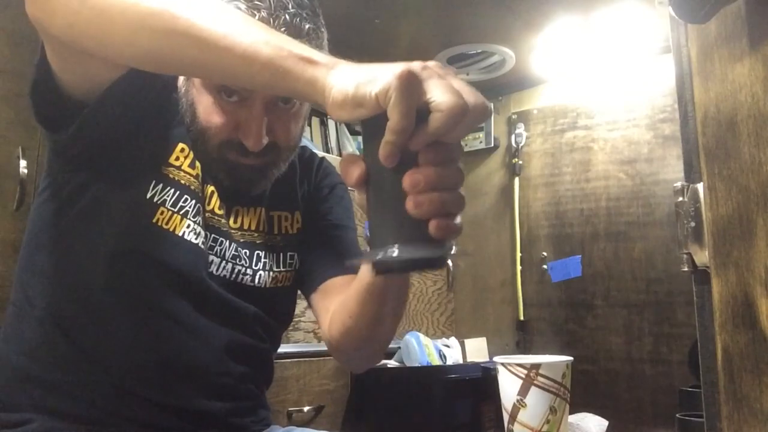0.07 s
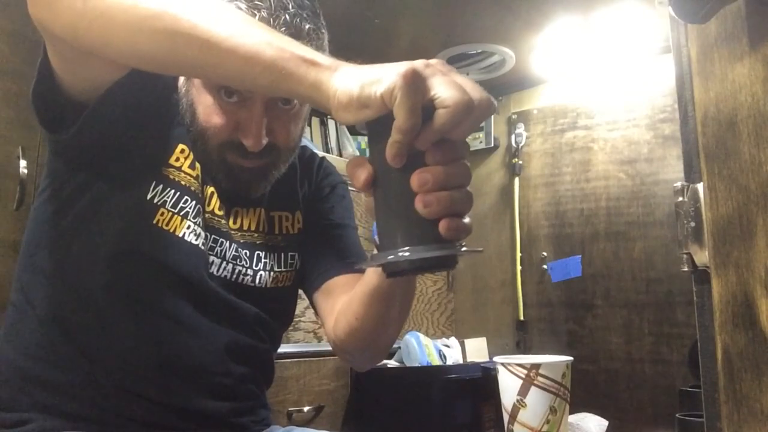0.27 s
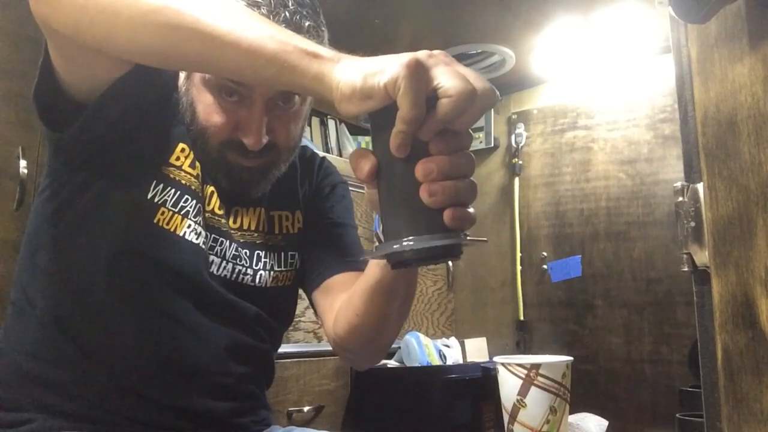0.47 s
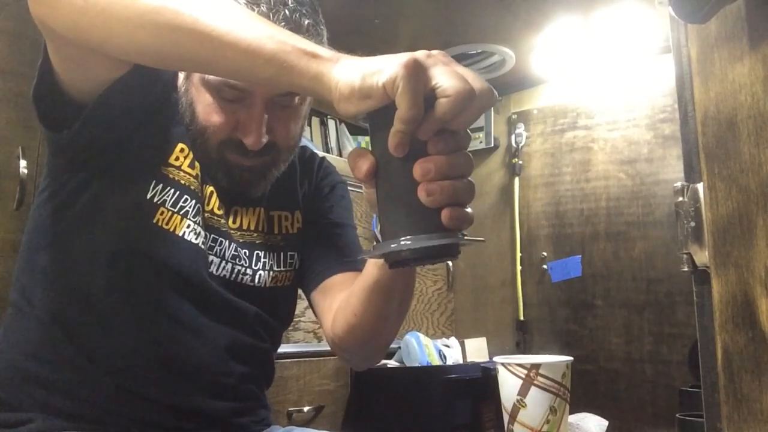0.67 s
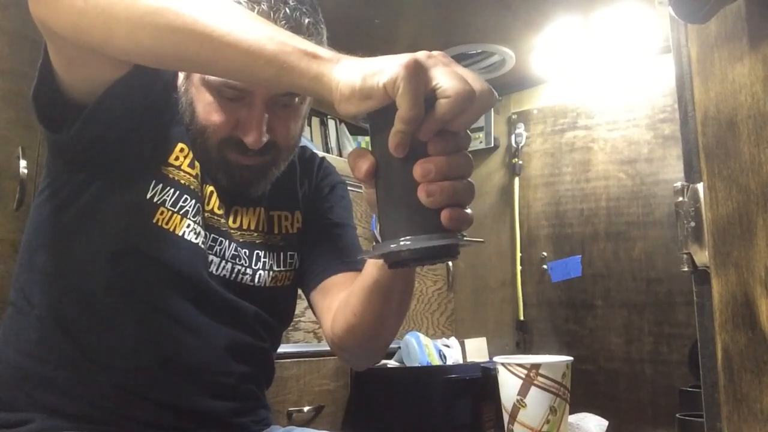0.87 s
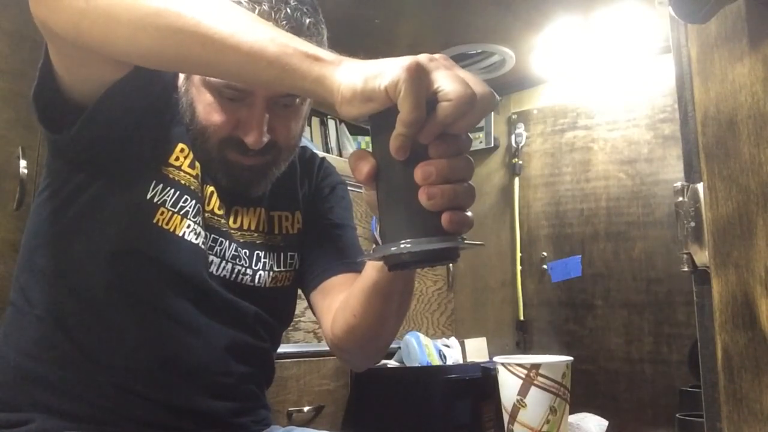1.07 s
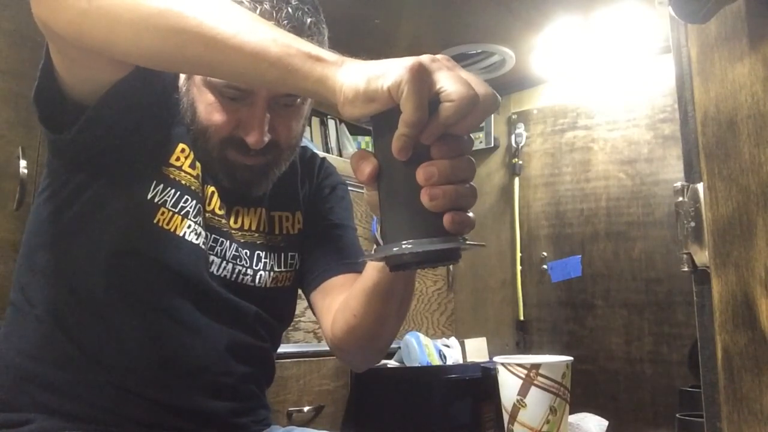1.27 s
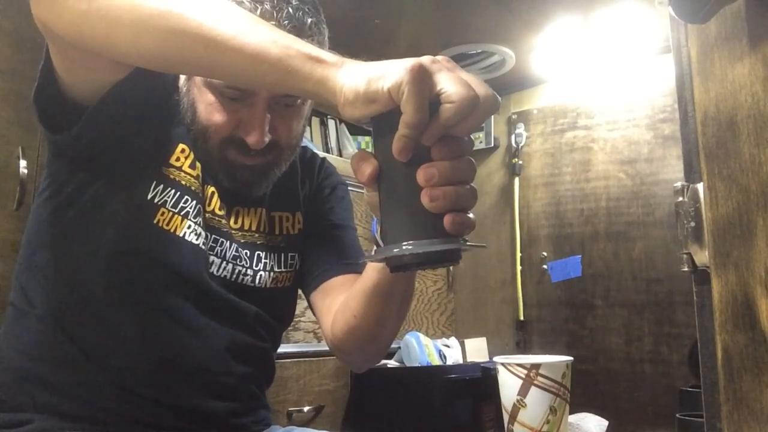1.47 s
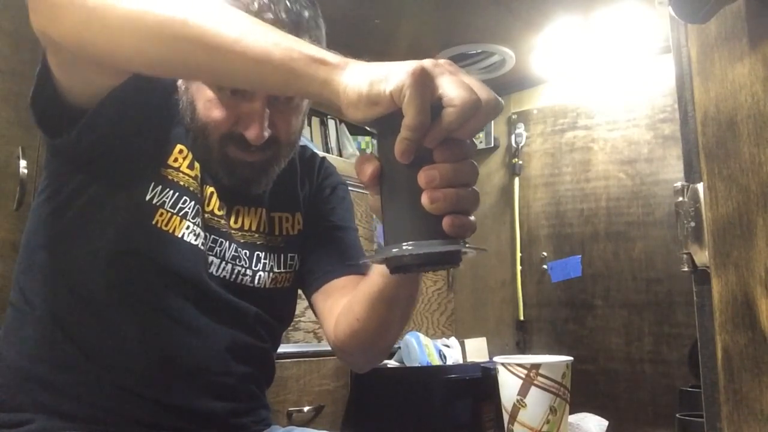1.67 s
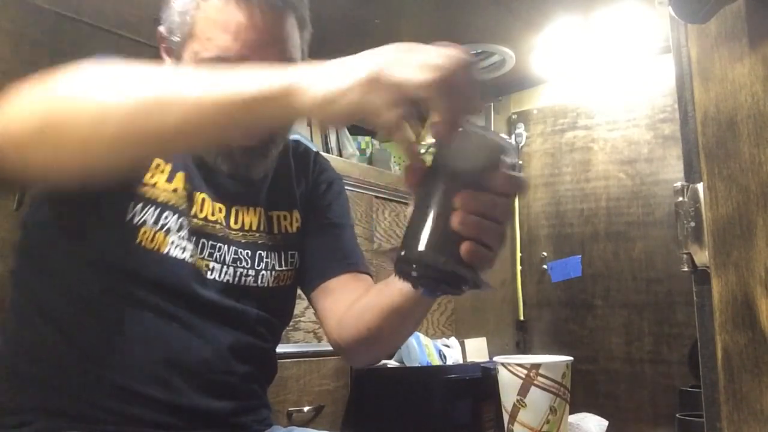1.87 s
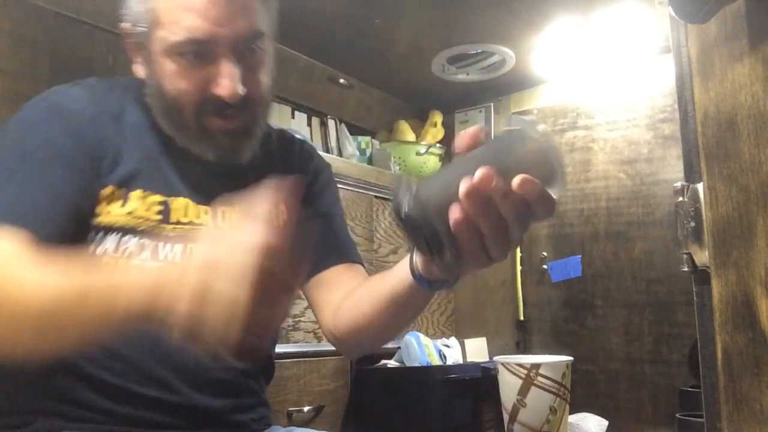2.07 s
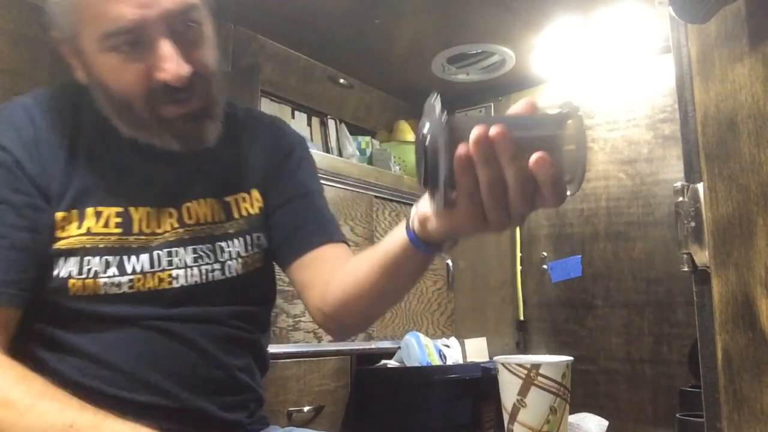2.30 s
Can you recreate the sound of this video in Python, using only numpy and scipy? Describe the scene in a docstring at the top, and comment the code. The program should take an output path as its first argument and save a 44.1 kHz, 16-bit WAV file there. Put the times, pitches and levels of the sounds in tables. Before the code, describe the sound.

A coffee plunger slams home right at the start: a loud, bright plastic clack with an airy pop, damped within about 0.15 s. Around 0.25-0.45 s spent grounds patter and thud into a paper bin, with a small rub near 0.47 s. Then quiet van rumble and faint wavering hum. At 1.77-1.95 s soft hollow taps hoot upward in pitch amid hand rustles; a last faint rub at 2.3 s. Close, with slight small-room echo.

```python
"""The dying ring of a knock, then a plastic coffee plunger clacks home, over rumble and wavering hum in a small van.
The blow is ringing modes, a pop and noise; spent grounds drop into a paper bin as grains and resonant knocks.
Hands rustle as coloured ticks. Later the plunger is drawn back and tapped: its air hoots, a sine rising in pitch.
A faint wall echo follows the near sounds; the recorder ducks its gain after loud peaks and softly clips."""
import sys
import numpy as np
from scipy import signal
from scipy.fft import rfft, irfft, next_fast_len
from scipy.io import wavfile
from scipy.ndimage import uniform_filter1d, minimum_filter1d, map_coordinates

SR = 44100
rng = np.random.default_rng(int(sys.argv[2]) if len(sys.argv) > 2 else 0)


def boost(x):
    """Linear amplitude factor 10**(x/20) for a level x in decibels (scalar or array-like)."""
    u = np.asarray(x, float) / 20
    return 10 ** u


def store_pcm(level_fs):
    """Save levels as 16-bit WAV."""
    pcm = np.round(np.clip(level_fs, -1, 1) * 32767).astype(np.int16)
    wavfile.write(sys.argv[1], SR, np.atleast_2d(pcm).T)


N = 103061
T = np.arange(N) / SR  # s


def unit(x):
    """Scale to rms 1."""
    return x / np.sqrt(np.mean(x ** 2) + 1e-20)


def along(points, hz):
    """Interpolate (Hz, value) points on a log frequency axis."""
    f, v = np.transpose(points)
    return np.interp(np.log(hz + 1), np.log(f + 1), v)


def wobble(knots_per_s):
    """Smooth random curve through normal knots."""
    knots = rng.standard_normal(int(N * knots_per_s / SR) + 4)
    return map_coordinates(knots, [T * knots_per_s])


def filtered(x, response):
    """Multiply the spectrum of x by a response of frequency in Hz."""
    m = next_fast_len(len(x) + 8192)
    return irfft(rfft(x, m) * response(np.fft.rfftfreq(m, 1 / SR)), m)[:len(x)]


def dying(start_s, t60_s, rise_s):
    """Envelope with exponential rise and decay."""
    t = np.maximum(T - start_s, 0)
    return boost(-60 * t / t60_s) * (1 - np.exp(-t / rise_s))


def tail(t60s, colour):
    """Noise in which each band dies at its own speed."""
    hz, t, z = signal.stft(rng.standard_normal(SR // 2), SR, nperseg=128)
    level_db = along(colour, hz)[:, None] - 60 * t / along(t60s, hz)[:, None]
    return signal.istft(z * boost(level_db), SR, nperseg=128)[1]


def grains(colour, spread_db):
    """Dense random ticks of uneven size, coloured, rms 1."""
    grains_per_s = 24000
    ticks = (rng.random(N) < grains_per_s / SR) * rng.standard_normal(N)
    ticks *= boost(spread_db * rng.exponential(size=N))
    return unit(filtered(ticks, lambda hz: boost(along(colour, hz))))


# Dying ring of an earlier knock. Each row: pitch in Hz, level in dB.
KNOCK_RING_PARTIALS = [(70, -28.5), (480, -27), (1100, -30.5), (2680, -20.5), (8200, -43)]
# Colour of skin rubbing. Each row: frequency in Hz, relative level in dB per Hz.
SKIN_COLOUR = [(500, -29.5), (1000, 0.5), (1900, 0.5), (3500, -6.5), (4300, -11), (8000, -16.5),
               (14700, -28.5), (16000, -61)]
# Modes of the struck plastic. Each row: pitch in Hz, relative level in dB, t60 in s.
PLASTIC_MODES = [(70, -5, .15), (620, -2.5, 0.035), (891, -7.5, 0.068), (1163, -7, 0.067),
                 (1352, -6, 0.088), (1512, -13.5, .24), (1559, -2, 0.067), (1747, -5.5, 0.097),
                 (2080, -10, 0.059), (2483, -1.5, 0.1), (2651, -3, 0.088), (4010, -4, .08),
                 (4240, 3, 0.068), (4453, -0.5, 0.065), (4920, -7, 0.06)]
# Colour of the crash noise. Each row: frequency in Hz, relative level in dB per Hz.
CRASH_COLOUR = [(30, -17.5), (70, -4), (200, -15), (500, -5), (750, -13.5), (1340, -2), (2000, -6.5),
                (4320, -1.5), (7600, -7.5), (8600, -18.5), (14900, -27.5), (16000, -60.5)]
# Decay of the crash noise. Each row: frequency in Hz, t60 in s.
CRASH_DECAY = [(100, .12), (500, 0.055), (2000, 0.11), (12000, 0.083)]
# Short cracks as the plunger chatters. Each row: delay after the blow in s, relative level in dB.
REBOUND_CRACKS = [(0, 5), (.0043, 2), (.0125, -2.5)]


def plunger():
    """An earlier knock's ring ends, then the blow rings the plastic, pops the air and sprays noise."""
    knock_ring_end_s, blow_s, blow_db = .0065, .0097, 7
    ring_db, grip_s, grip_t60_s = -15, 0.093, 0.07
    pop_hz, pop_db, pop_t60_s = 528, -5, 0.024
    crack_s, crash_db = .0007, -11.5

    knock_ring = sum(boost(db) * np.sin(2 * np.pi * hz * T + 1.5 * wobble(450))
                     for hz, db in KNOCK_RING_PARTIALS)
    knock_ring += boost(-40) * grains(SKIN_COLOUR, spread_db=0.6)
    knock_ring *= np.exp(-np.maximum(T - knock_ring_end_s, 0) / 0.00039)

    since_s = T - blow_s
    blow = np.zeros(N)
    for hz, db, t60_s in PLASTIC_MODES:
        mode = np.sin(2 * np.pi * hz * since_s + 0.4 * wobble(80))
        blow += boost(ring_db + db) * dying(blow_s, t60_s, 0.000067) * mode
    blow *= boost(-60 * np.maximum(T - grip_s, 0) / grip_t60_s)  # the hand closes and damps the ring
    blow += boost(pop_db) * dying(blow_s, pop_t60_s, 0.0005) * np.sin(2 * np.pi * pop_hz * since_s)

    crash = tail(CRASH_DECAY, CRASH_COLOUR)
    t = T[:len(crash)]
    cracks = sum(boost(db) * (t >= late_s) * np.exp(-np.abs(t - late_s) / crack_s)
                 for late_s, db in REBOUND_CRACKS)
    crash = (1 + cracks) * crash / crash[:400].std()
    blow[round(blow_s * SR):][:len(crash)] += boost(crash_db) * crash
    return knock_ring + boost(blow_db) * blow


# Decay of the wall echo. Each row: frequency in Hz, t60 in s.
WALLS_DECAY = [(200, .2), (2000, 0.23), (10000, 0.053)]


def walls(near):
    """Echo: near sounds, 130 samples late, convolved with decaying noise."""
    walls_db = -28
    echo = tail(WALLS_DECAY, [(100, 0)])
    wet = signal.fftconvolve(np.pad(near, (130, 0)), echo / np.linalg.norm(echo))[:N]
    return boost(walls_db) * wet


# Colour of rumble and hiss. Each row: frequency in Hz, relative level in dB per Hz.
VAN_COLOUR = [(20, -25), (45, -4), (91, -1), (200, -11), (290, -19), (560, -18), (800, -25.5),
              (1120, -23.5), (2300, -35), (2700, -41), (7500, -43), (8500, -46), (14700, -49.5),
              (16000, -70)]
# Hum coming and going. Each row: time in s, level in dB before wavering.
HUM_LEVEL = [(1.0, -68), (1.6, -61.5), (1.9, -65.5), (2.03, -54), (2.2, -68.5)]


def van():
    """Noise with patchy time-frequency level, plus a sine wavering in level and phase."""
    air_db, hum_hz = -50, 568
    hz, _, z = signal.stft(rng.standard_normal(N), SR, nperseg=1024)
    field = uniform_filter1d(rng.standard_normal(z.shape), 4, 0)
    field = unit(uniform_filter1d(field, 3, 1))
    patchy_db = along([(100, 3.0), (1000, 4.2), (8000, 0.79)], hz)[:, None]
    air = signal.istft(z * boost(patchy_db * field), nperseg=1024)[1][:N]
    air = filtered(air, lambda f: boost(along(VAN_COLOUR, f)))
    hum_db = np.interp(T, *np.transpose(HUM_LEVEL)) + 2.5 * wobble(12)
    hum = boost(hum_db) * np.sin(2 * np.pi * hum_hz * T + 0.36 * wobble(11))
    return boost(air_db) * unit(air) + hum


# Falling grounds. Each row: time in s, relative patter level in dB.
GROUNDS_FALL = [(.233, -60), (.256, -62.5), (.262, -47.5), (.296, -52), (.299, -34), (.306, -42.5),
                (.315, -39), (.332, -36.5), (.352, -37.5), (.368, -42.5), (.384, -55), (.396, -52),
                (.41, -57.5), (.448, -65.5), (.472, -63), (.5, -80), (.54, -77)]
# Colour of grit. Each row: frequency in Hz, relative level in dB per Hz.
PATTER_COLOUR = [(500, -12), (1200, -5.5), (4260, -6), (13800, -11.5), (15500, -14.5), (16000, -40)]
# Bin resonances. Each row: pitch in Hz, width in Hz, relative level in dB.
BIN_MODES = [(464, 80, -9.5), (589.3, 47, -8.5), (740, 69, -8.5), (885, 35, 1), (1010, 160, -10)]
# Lumps knocking the bin. Each row: time in s, relative level in dB, pitch favoured by the spot in Hz.
LUMP_KNOCKS = [(.2655, -22.5, 564), (.2685, -24.5, 1010), (.279, -39, 885), (.309, -20, 740),
               (.314, -23, 885), (.32, -25, 885), (.328, -21.5, 570), (.333, -27, 906), (0.366, -36, 900)]


def grounds():
    """Fine grains patter on the paper; each soft lump rings the bin's resonances nearest to its spot."""
    patter_db, boom_db = 5.5, 25
    lump_s, off_spot_db_per_octave = 0.00041, 34
    bin_low_hz = 446  # high-pass keeps the knocks from booming below this

    fall_db = np.interp(T, *np.transpose(GROUNDS_FALL), -120, -120)
    patter = boost(patter_db + fall_db + 1.53 * wobble(150.2)) * grains(PATTER_COLOUR, spread_db=-1.5)

    boom = np.zeros(N)
    for hz, width_hz, db in BIN_MODES:
        pushes = np.zeros(N)
        for s, level_db, spot_hz in LUMP_KNOCKS:
            push_db = level_db - off_spot_db_per_octave * abs(np.log2(hz / spot_hz))
            pushes += boost(push_db) * np.exp(-((T - s) / lump_s) ** 2)
        boom += filtered(pushes, lambda f: boost(db) * 1j * f * width_hz
                         / (hz * hz - f * f + 1j * f * width_hz))
    return patter + boost(boom_db) * filtered(boom, lambda f: (1j * f / (bin_low_hz + 1j * f)) ** 2)


# Small ticks and one low thump. Each row: start in s, level in dB before the rise, pitch in Hz.
PING_HITS = [(0.262, -30.5, 5070), (0.264, -25.5, 160), (0.2985, -25, 2940), (.298, -28.5, 6000),
             (.36, -29, 1450), (0.469, -39.5, 1809), (.317, -29, 4950), (1.776, -48, 2000),
             (1.875, -36.5, 1030), (1.916, -42, 2500), (1.93, -36.5, 1905), (1.946, -44.5, 2087)]


def pings():
    """Brief rough rings with random phase, and a thin, longer two-pitch sizzle."""
    ping_t60_s, rough_rad = 0.026, 1
    sizzle_s, sizzle_db, sizzle_t60_s = .458, -61.5, 0.4
    sizzle = sum(np.sin(2 * np.pi * hz * T + 0.87 * wobble(250)) for hz in (3400, 3630))
    out = boost(sizzle_db) * dying(sizzle_s, sizzle_t60_s, .001) * sizzle
    for s, db, hz in PING_HITS:
        ring = np.sin(2 * np.pi * hz * T + rough_rad * wobble(350))
        out += boost(db) * dying(s, ping_t60_s, 0.00093) * ring
    return out


# Rubs of the hands. Each row: start in s, length in s, level in dB before wobble, brightness 0-1.
RUSTLE_STROKES = [(0.452, 0.08, -62, 0.2), (.467, 0.0043, -47, 0), (0.581, 0.0051, -63.5, .95),
                  (1.051, 0.06, -66, 0.66), (1.747, 0.037, -62.5, .1), (1.868, 0.012, -52, 0.4),
                  (1.895, 0.055, -52.5, 0.18), (2.289, 0.0058, -54.5, 0.1), (2.3, 0.047, -65, 0.8)]


def hands():
    """Short soft rubs, blended from dull skin to bright dry grit."""
    rise_s, fade_s = 0.0029, 0.01
    dull, bright = grains(SKIN_COLOUR, spread_db=0.8), grains(PATTER_COLOUR, spread_db=0.6)
    strokes = np.zeros(N)
    for s, length_s, db, shine in RUSTLE_STROKES:
        rise = np.clip((T - s) / rise_s, 0, 1)
        fade = np.exp(-np.maximum(T - s - length_s, 0) / fade_s)
        strokes += boost(db) * rise * fade * (dull + np.clip(shine, 0, 1) * (bright - dull))
    return strokes * boost(0.83 * wobble(100))


# Air in the chamber. Each row: time in s, pitch in Hz.
CHAMBER_PITCH = [(1.772, 460), (1.8, 550), (1.825, 595), (1.88, 625), (1.92, 641)]
# Taps on the chamber. Each row: start in s, hoot level in dB, click level in dB.
CHAMBER_TAPS = [(1.773, -40.5, -49), (1.79, -39.5, -65), (1.878, -40, -60), (1.917, -29.5, -41),
                (1.922, -31.5, -55), (1.929, -26, -39.5)]


def chamber():
    """Taps click and set the air column ringing; it rises in pitch as the plunger moves."""
    hoot_t60_s, hoot_rise_s, click_t60_s, click_rise_s = 0.11, 0.0018, 0.019, 0.00025
    pitch_hz = np.interp(T, *np.transpose(CHAMBER_PITCH))
    tone = np.sin(2 * np.pi * np.cumsum(pitch_hz) / SR)
    hoot = sum(boost(db) * dying(s, hoot_t60_s, hoot_rise_s) for s, db, _ in CHAMBER_TAPS)
    click = sum(boost(db) * dying(s, click_t60_s, click_rise_s) for s, _, db in CHAMBER_TAPS)
    return hoot * tone + click * grains(SKIN_COLOUR, spread_db=0.7)


def scene():
    """Near sounds, their echo off the walls, and the van."""
    near = plunger() + grounds() + pings() + hands() + chamber()
    return (near + walls(near) + van())[None]


def top_cut(x):
    """Nothing passes above the cut-off."""
    return signal.sosfilt(signal.butter(12, 16390, fs=SR, output="sos"), x)


def record(dry):
    """Loud peaks duck the gain, which holds and then returns; the rest softly clips."""
    duck_from_db, duck_db, hold_s, release_s, clip_at = -18.5, 5.5, .29, .11, .96
    level_db = 20 * np.log10(np.abs(dry[0]) + 1e-9)
    need_db = -np.clip(level_db - duck_from_db, 0, duck_db)
    hold, release = int(hold_s * SR) | 1, int(release_s * SR) | 1  # odd sample counts
    # origins make both windows look back in time
    held_db = minimum_filter1d(need_db, hold, origin=hold // 2, mode="nearest")
    eased_db = uniform_filter1d(held_db, release, origin=release // 2, mode="nearest")
    gain_db = np.minimum(held_db, eased_db)
    x = dry * boost(uniform_filter1d(gain_db, size=88))
    mix = x / (1 + np.abs(x / clip_at) ** 6) ** (1 / 6)
    return top_cut(mix)


dry = scene()
out = record(dry)
store_pcm(out)
```